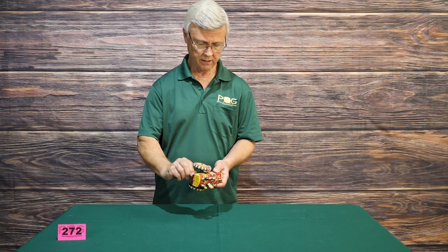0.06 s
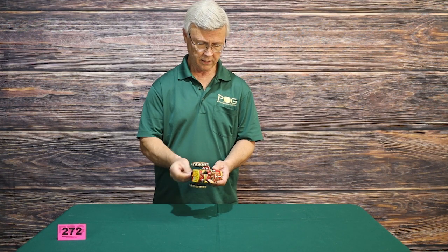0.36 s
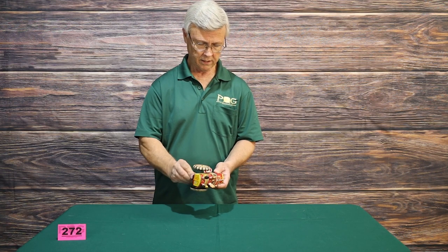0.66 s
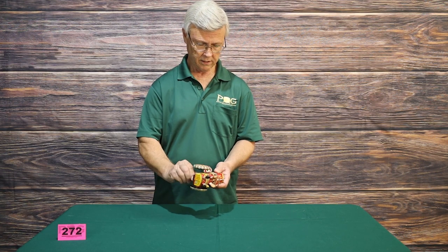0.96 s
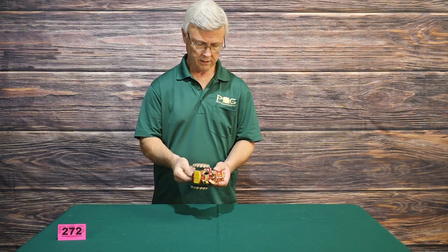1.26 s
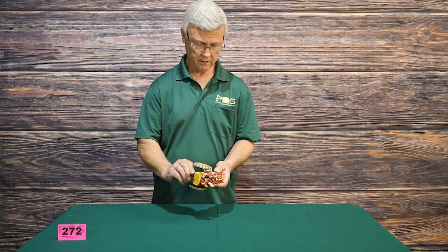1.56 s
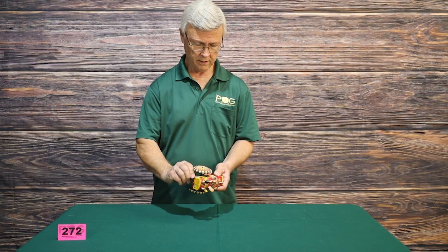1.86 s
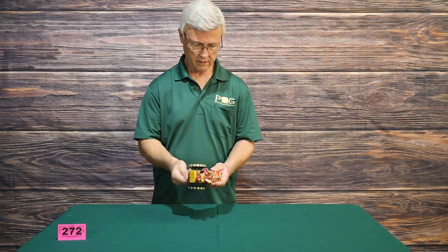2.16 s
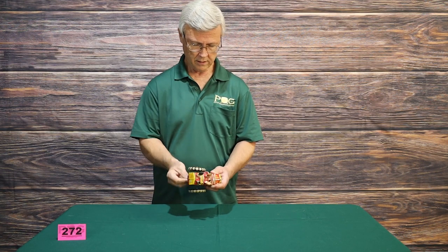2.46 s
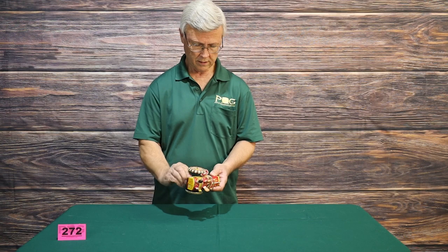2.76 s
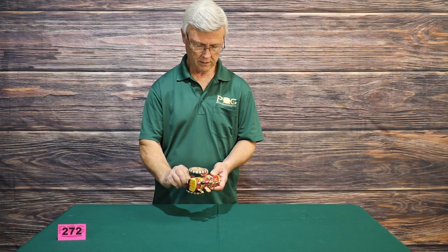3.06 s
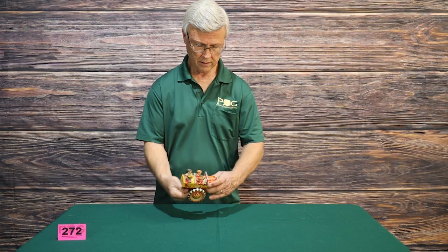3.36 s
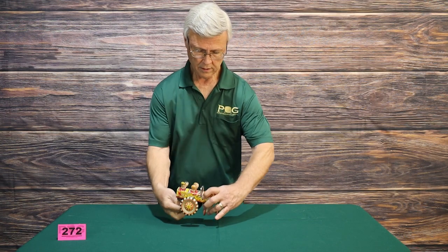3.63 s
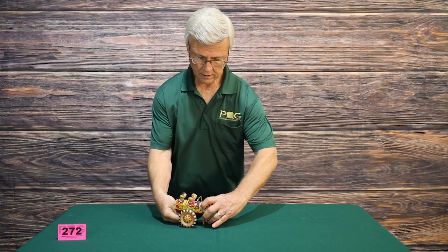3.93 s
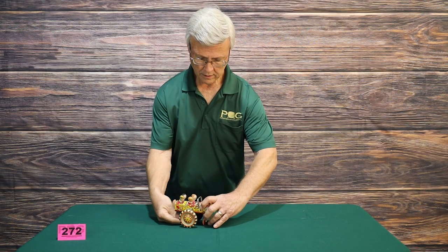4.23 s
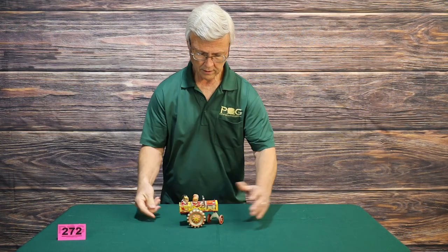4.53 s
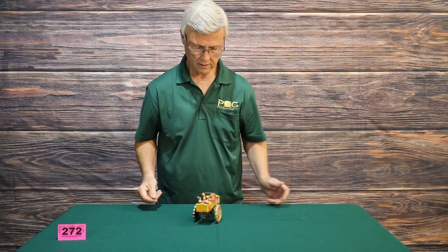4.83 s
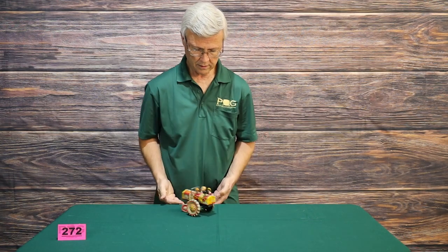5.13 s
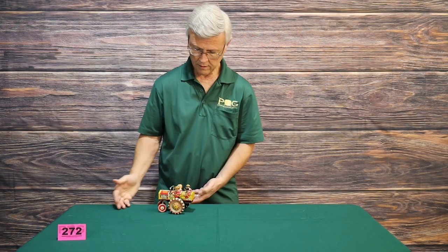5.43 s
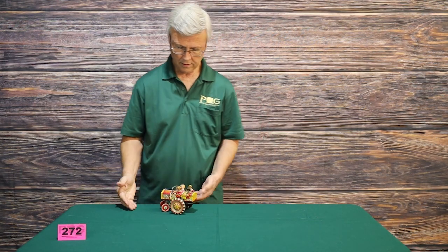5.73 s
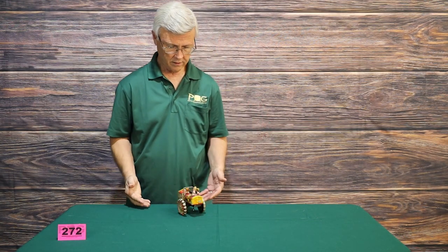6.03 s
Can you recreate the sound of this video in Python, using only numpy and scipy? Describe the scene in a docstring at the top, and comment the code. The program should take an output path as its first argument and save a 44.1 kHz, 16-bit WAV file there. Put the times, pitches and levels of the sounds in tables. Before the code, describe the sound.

Ratcheting clicks and key grinding from a wind-up tin tractor, followed by soft knocks, short gear whirrs and tinny clacks.

```python
"""A tin toy tractor's ratchet clicks as it is wound by hand in a small room; the key grinds and jolts.
Each impact is a broadband snap plus the damped modes of body, side plates, wheel, spring and pawl.
Set down on a cloth-covered table, the toy clinks, its gears whirr in spurts of tiny tooth contacts,
and it is nudged about with a few soft knocks and three sharp clacks.
A low hum and faint room noise lie underneath."""
import sys
import numpy as np
from scipy import signal
from scipy.io import wavfile

SR = 44100
rng = np.random.default_rng(int(sys.argv[2]) if len(sys.argv) > 2 else 0)


def transcribe(u):
    """Save the signal u as a 16-bit wav file named by the first command-line argument.

    u: samples, shape (n,) or (channels, n), limited to [-1, 1]; the rate is SR.
    q: integer samples, one column per channel.
    """
    v = np.clip(np.atleast_2d(u).T, -1, 1)
    q = np.round(v * 32767).astype(np.int16)
    wavfile.write(sys.argv[1], SR, q)


N = 272979
SIZE = 16384  # samples in one impulse response
AGE = np.arange(SIZE) / SR
TIME = np.arange(N) / SR


def amp(db):
    """Amplitude ratio of a level in decibels."""
    return 10 ** (np.asarray(db) / 20)


def unit(x):
    """Normalisation to rms 1."""
    return x / np.sqrt(np.mean(x ** 2) + 1e-20)


def levelled(x, db):
    """Normalisation of a transient by the rms level of its first 20 ms."""
    return amp(db) * x / np.sqrt(np.mean(x[:SR // 50] ** 2) + 1e-20)


def add(mix, s, sound):
    """Superposition: a sound joins the mix at s seconds."""
    part = mix[max(round(s * SR), 0):][:len(sound)]
    part += sound[:len(part)]


def colour(x, points):
    """Minimum-phase filtering by a curve of (f/Hz, level/dB) points."""
    hz, db = np.transpose(points)
    log_hz = np.log(abs(np.fft.fftfreq(SIZE, 1 / SR)) + 1)
    log_gain = np.log(amp(np.interp(log_hz, np.log(hz), db)))
    taps = np.fft.ifft(np.exp(signal.hilbert(log_gain).conj())).real[:SIZE // 2]
    return signal.fftconvolve(x, taps)[:len(x)]


def dying(t60):
    """Exponential decay: noise of energy 1 falls 60 dB in t60 seconds."""
    x = rng.standard_normal(SIZE) * amp(-60 * AGE / t60)
    return x / np.linalg.norm(x)


def blow(contact_s, rattle_db, room_db, rattle_t60=0.11):
    """Noise excitation: a brief scrape, rattle and early reflections, then reverberation."""
    room = dying(t60=0.31) * (1 - np.exp(-AGE / 0.0032))
    return dying(contact_s) + amp(rattle_db) * dying(rattle_t60) + amp(room_db) * room


def tap(rattle_db, room_db):
    """Impulse excitation: an instant contact, then rattle and reverberation."""
    room = dying(t60=0.34) * (1 - np.exp(-AGE / 0.003))
    return signal.unit_impulse(SIZE) + amp(rattle_db) * dying(t60=0.1) + amp(room_db) * room


def ring(modes, detune, spread_db=2):
    """Free vibration: damped modes (f/Hz, level/dB, T60/s), varied at random for strike point and grip."""
    hz, db, t60 = np.transpose(modes)[:, :, None]
    strength, shift, phase = rng.standard_normal((3, len(modes), 1))
    age = AGE[:SIZE // 2]
    waves = np.sin(2 * np.pi * (hz * (1 + detune * shift) * age + phase))
    return (amp(db + spread_db * strength - 60 * age / t60) * waves).sum(0)


def driven(response, drive, db):
    """Forced response: an impulse response convolved with its drive, set to an onset level."""
    return levelled(signal.fftconvolve(response, drive)[:SIZE], db)


def damped(x, extra_db, t60):
    """Two-stage decay: a hard-hit part starts louder and quickly sheds the excess."""
    return x * (1 + amp(extra_db) * amp(-60 * AGE[:len(x)] / t60))


def teeth(per_s, spread_db, hiss, rattle_db, contact_s):
    """Shot noise: tiny random contacts of unequal size over a smooth sliding hiss."""
    impulses = (rng.random(N) < per_s / SR) * amp(spread_db * np.minimum(rng.exponential(1, N), 3))
    impulses *= rng.choice([-1, 1], N)
    contacts = signal.fftconvolve(impulses, blow(contact_s, rattle_db, room_db=-18))[:N]
    return unit(contacts) + hiss * rng.standard_normal(N)


def strokes(rows, attack_s, release_s, swell_db_per_s):
    """Amplitude envelope: each stroke rises linearly, swells slowly and decays exponentially."""
    out = np.zeros(N)
    for start, end, db in rows:
        rise = np.clip((TIME - start) / attack_s, 0, 1)
        swell_db = swell_db_per_s * (np.clip(TIME, start, end) - (start + end) / 2)
        out += amp(db + swell_db) * rise * np.exp(-np.maximum(TIME - end, 0) / release_s)
    return out


# spectrum of the room noise (f/Hz, level/dB)
AIR_SPECTRUM = [(59, -35.5), (100, -12.5), (197, 0), (229, -2), (328, 1), (406, -5.5), (452, -6), (621, -8),
                (818, -6), (872, -2.5), (991, -12), (1330, -14), (16000, -39.5)]
# tones of a distant motor and the mains (f/Hz, level/dB)
HUM_TONES = [(28.5, -17), (41.3, -4), (57.9, 7), (60, -17), (115.8, -37), (120, -19)]
def background(air_db=-43, rumble_db=-56, hum_db=-39.5, fade_db_per_s=1.3):
    """Beating: close tones make a pulsing hum that slowly fades over stationary room noise."""
    air = unit(colour(rng.standard_normal(N + SIZE), AIR_SPECTRUM)[SIZE:])
    rumble_spectrum = [(12, 11.5), (40, 4), (110, 15.5), (250, -18), (1000, -90.5)]
    rumble = unit(colour(rng.standard_normal(N + SIZE), rumble_spectrum)[SIZE:])
    hum = unit(sum(amp(db) * np.sin(2 * np.pi * (hz * TIME + rng.random())) for hz, db in HUM_TONES))
    return amp(air_db) * air + amp(rumble_db) * rumble + amp(hum_db - fade_db_per_s * TIME) * hum


# spectrum of the grinding key (f/Hz, level/dB)
GRIND_SPECTRUM = [(200, -29.5), (500, 2), (1000, 13), (1350, -5), (2500, -1.5), (3000, -11), (3550, 9.5),
                  (3950, -21), (4500, 4), (5700, -9), (8000, -38), (9900, -12), (11500, -24), (16000, -22)]
# strokes of the key (start t/s, end t/s, level/dB)
KEY_TURNS = [(0, 0.113, -31), (0.362, 0.528, -40), (0.681, 0.957, -42.5), (0.948, 1.3, -39.5),
             (1.581, 1.787, -35.5), (2.076, 2.439, -41), (2.667, 2.89, -40), (3.093, 3.35, -41),
             (3.417, 3.6, -43)]
def key_grind():
    """Sliding friction: dense small contacts grind during each stroke of the key."""
    friction = teeth(per_s=140, spread_db=2, hiss=0.29, rattle_db=6.5, contact_s=0.023)
    envelope = strokes(KEY_TURNS, attack_s=0.0083, release_s=0.062, swell_db_per_s=6)
    return unit(colour(friction, GRIND_SPECTRUM)) * envelope


# spectrum of metal striking metal (f/Hz, level/dB)
SNAP_SPECTRUM = [(100, -20), (300, -24.5), (550, -0.5), (1000, -12), (1400, -4), (1850, -0.5), (2600, 0),
                 (4000, 0.5), (5400, -1), (7200, -7.5), (9000, -12), (12000, -15.5), (15500, -21.5),
                 (17000, 1.5)]
# short-lived modes of the thin tin shell (f/Hz, level/dB, T60/s)
SHELL_MODES = [(1400, -1, .04), (1669, 0, .05), (1830, 1, .05), (2060, -2, .04), (2390, -2, .05),
               (2761, 0, .06), (4000, 0, .04), (5780, -2, .04), (6470, -7, .05), (7730, -7, .06),
               (8915, -5, .05), (11560, -7, .04), (14400, -3, .03)]
def snap(scrape_db, shell_db=-7):
    """Broadband excitation: a contact, its chatter and the room's dull tail drive the tin shell."""
    chatter = blow(contact_s=0.048, rattle_db=3.5 + scrape_db, room_db=-11 + scrape_db, rattle_t60=0.13)
    chatter = colour(chatter, [(5000, 0.0043), (15000, -2)])
    tail = colour(dying(t60=0.26) * (1 - np.exp(-AGE / 0.0023)), [(4000, 0.0082), (12000, -9)])
    contact = amp(-2) * dying(t60=0.024) + chatter + amp(scrape_db - 1.5) * tail
    shell = signal.fftconvolve(ring(SHELL_MODES, detune=0.028), contact)[:SIZE]
    return unit(colour(contact, SNAP_SPECTRUM)) + amp(shell_db) * unit(shell)


# spectrum of the first instant of a hard contact (f/Hz, level/dB)
CRACK_SPECTRUM = [(200, -48), (550, -35), (1000, -19), (3000, 4), (7000, -11), (10000, 2), (13000, -1.5),
                  (15500, -1), (17000, 2)]
def crack(snap_db, growth=0.55):
    """Contact stiffening: harder blows are briefer, so their bright crack grows faster than the snap."""
    crack_db = snap_db - 7 + growth * (snap_db + 31)
    return levelled(colour(dying(t60=0.028), CRACK_SPECTRUM), crack_db)


# modes of the five parts: hollow body, side plates, wheel, spring, pawl (f/Hz, level/dB, T60/s)
BODY_MODES = [(620, -16.5, .04), (727.4, -3.5, 0.061), (785, -5, 0.074), (877.6, 5.5, 0.045),
              (1004, 5.5, 0.04), (1059, 5.5, 0.054), (1105, -14, 0.043), (1246, -10, .04)]
PLATE_MODES = [(2980, -18, 0.09), (2894, -8.5, 0.087), (3033, 5, 0.057), (3140, -6, 0.16), (3284, 8, 0.037),
               (3412, -0.5, 0.045), (3530, 1, 0.13), (3503, -2, 0.202), (3723, -8.5, 0.1)]
WHEEL_MODES = [(4330, -9, .03), (4470, -2, .08), (4503, 0, .11), (4600, -8, .04)]
SPRING_MODES = [(4850, -4, .04), (5020, -7, .05), (5224, 0, .12), (5400, -9, .04), (7700, -20, .07)]
PAWL_MODES = [(9337, 0, .1), (9560, -4, .07), (9990, -2, .06), (10130, -2, .07), (10415, -2, .13),
              (11100, -7, .06), (12170, -2, .09), (12930, -6, .1), (13960, -9, .1)]
def click(db, parts_db, scrape_db, body_pitch=1, sustain=1, plate_db_per_khz=0, grip_db=0):
    """Modal superposition: one impact gives a snap and a crack and sets all five parts ringing."""
    body_db, plate_db, wheel_db, spring_db, pawl_db = db + parts_db
    x = levelled(snap(scrape_db), db) + crack(db)
    body = ring(np.multiply(BODY_MODES, (body_pitch, 1, 1)), detune=0.0095)
    x += driven(body, blow(contact_s=0.0091, rattle_db=-4.5, room_db=-12.5), body_db)
    tilted = [(hz, level + plate_db_per_khz * hz / 1e3, t60 * sustain) for hz, level, t60 in PLATE_MODES]
    plates = damped(ring(tilted, detune=0.0036), extra_db=33 + grip_db, t60=0.064)
    x += driven(plates, tap(rattle_db=0.5, room_db=-9), plate_db)
    x += driven(ring(WHEEL_MODES, detune=0.0016), tap(rattle_db=-0.5, room_db=-14), wheel_db)
    spring = ring(np.multiply(SPRING_MODES, (1, 1, sustain)), detune=0.001538)
    spring = damped(spring, extra_db=12.5 + grip_db, t60=0.052)
    x += driven(spring, tap(rattle_db=-1, room_db=-7), spring_db)
    pawl = damped(ring(PAWL_MODES, detune=0.0022, spread_db=5.5), extra_db=0, t60=0.049)
    return x + driven(pawl, tap(rattle_db=-3.5, room_db=-16), pawl_db)


PAWL_SHARE = 0.33  # fraction of a contact's ringing/dB that the pawl receives
# coupling of a tick to body, side plates, wheel, spring, pawl (level/dB each)
TICK_COUPLING = (-5, 0, -2, -6, -6.5)
def tick(db, ring_db, lean_db):
    """Mechanical coupling: a ratchet tooth excites mostly the wheel and the side plates."""
    extra_db = (0, ring_db - lean_db, ring_db + lean_db, (ring_db + lean_db) / 2, PAWL_SHARE * ring_db)
    return click(db, np.add(TICK_COUPLING, extra_db), scrape_db=-1)


def light_ticks(spacing_s=0.045, relative_db=-13.5, spread_db=0.5):
    """Jittered impulse train: faint, uneven ticks run through every stroke of the key."""
    out = np.zeros(N)
    for start, end, db in KEY_TURNS:
        for s in np.arange(start, end - spacing_s / 2, spacing_s):
            strength, lean = spread_db * rng.standard_normal(2)
            onset = s + spacing_s * rng.random()
            add(out, onset, tick(db + relative_db + strength, ring_db=12, lean_db=lean - 1))
    return out


# ratchet ticks (t/s, level/dB, ringing/dB, lean from side plates to wheel/dB)
RATCHET_TICKS = [(.029, -33, 7, -1.5), (.042, -20.5, -3, 2.5), (.065, -24.5, 4, 7.5), (.087, -24, 1.5, -2),
                 (.120, -23, 4.5, -0.5), (0.165, -48.5, 23.5, -1.5), (.236, -51, 9, 2),
                 (0.439, -46.5, 12, 3), (0.61, -30, -8, -7), (.623, -37.5, 12.5, 2.5), (.632, -30, 9, 0),
                 (0.818, -56.5, 18.5, 1), (0.88, -43, 12, -1), (.942, -32.5, 3.5, -6), (0.955, -36, 7, 2),
                 (1.019, -28, 1, 3), (1.0375, -23.5, 0, -0.5), (1.105, -30, 9, 2), (1.176, -27.5, 8, 0.5),
                 (1.351, -21.5, 3, -0.5), (1.369, -20.5, 1.5, 0.5), (1.397, -21, 1, 3.5),
                 (1.6837, -42.5, 9, 0.5), (1.762, -46, 7.5, -3), (1.777, -32.5, 4, 7),
                 (1.8752, -38, -2, 4.5), (1.881, -26.5, 4.5, -0.5), (1.894, -19, -3.5, 2),
                 (1.907, -27.5, 8.5, 6.5), (1.956, -22.5, 6, 1.5), (2.106, -52.5, 20, -2),
                 (2.303, -29, 2.5, 2), (2.379, -50, 16, -2), (2.447, -25.5, 6, 0), (2.460, -27, 3, 3),
                 (2.712, -47, 0.5, -13), (2.770, -41.5, 4.5, -4.5), (2.846, -53, 14, -6),
                 (2.859, -21, 7, 2.5), (2.878, -45, 23, 3), (2.892, -31.5, 10, -9.5), (2.912, -25.5, 1, 3),
                 (2.935, -26, 4, 2), (2.965, -28, -1.5, -1.5), (3.0811, -49.5, 8, 0),
                 (3.114, -34.5, 1.5, -2), (3.124, -28, -1.5, -0.5), (3.199, -52, 11, -5),
                 (3.212, -29.5, 0, 1), (3.374, -21, 1, 0.5), (3.489, -55.5, 17.5, 5.5)]
def ratchet():
    """Impact excitation: the pawl drops over tooth after tooth as the toy is wound."""
    out = np.zeros(N)
    for s, db, ring_db, lean_db in RATCHET_TICKS:
        add(out, s, tick(db, ring_db, lean_db))
    return out


# notes of the ringing pawl (t/s, f/Hz, level/dB)
PAWL_RINGS = [(.087, 9350, -25), (1.019, 12100, -36), (1.0378, 10460, -27.5), (1.176, 9740, -27),
              (1.397, 9450, -29), (1.956, 10200, -16.5), (3.124, 10120, -31.5), (3.374, 13100, -19),
              (3.510, 12400, -39), (5.4195, 13960, -29)]
def pawl_notes(t60=0.038, split_hz=70):
    """Free vibration: now and then the pawl springs clear and sings on a close pair of modes."""
    out = np.zeros(N)
    for s, hz, db in PAWL_RINGS:
        pair = ring([(hz, 0, t60), (hz + split_hz, -3, t60 / 2)], detune=0.0005)
        note = damped(pair, extra_db=-1.5, t60=0.035)
        add(out, s, driven(note, tap(rattle_db=-10, room_db=-16), db))
    return out


# jolts of the key in its socket (t/s, level/dB, ringing/dB)
KEY_JOLTS = [(0.352, -34, 0), (.483, -23, -9), (.493, -27, -3), (1.0769, -25.5, -2), (1.150, -23.5, -5),
             (1.2048, -24, -3), (1.225, -29.5, 1.5), (1.293, -41, 10.5), (1.570, -36.5, 3),
             (1.798, -32.5, -15), (2.256, -19.5, -1.5), (2.418, -24.5, 1.5), (2.632, -40, -0.5),
             (3.1742, -22.5, -4.5), (3.257, -22.5, 2), (3.3103, -24.5, -4), (3.317, -24.5, -2),
             (3.334, -30, -3), (3.360, -30, -1)]
# coupling of a jolt to body, side plates, wheel, spring, pawl (level/dB each)
JOLT_COUPLING = (1.5, -0.5, -5.5, -7.5, -18.5)
def key_jolts():
    """Body resonance: the jolting key shakes the hollow body, with more scrape than a tick."""
    out = np.zeros(N)
    for s, db, ring_db in KEY_JOLTS:
        extra_db = (0, ring_db, ring_db, ring_db / 2, PAWL_SHARE * ring_db)
        add(out, s, click(db, np.add(JOLT_COUPLING, extra_db), scrape_db=2))
    return out


# clinks and three clacks of loose tin (t/s, level/dB, ringing/dB, lean from side plates to spring/dB)
TIN_CLINKS = [(3.510, -35, 9, -0.5), (3.529, -42, 6.5, 0), (3.573, -44, 3, -2.5), (3.762, -38, -19.5, 2),
              (3.79, -40.5, -10, 5), (3.798, -42.5, -7, -8.5), (3.877, -35.5, -16.5, -11),
              (3.93, -44, 10, -8), (3.936, -27, -5.5, 3.5), (4.268, -41, 10.5, -4.5), (4.415, -39, -12, 3),
              (4.452, -45, 2.5, 4.5), (4.458, -37.5, -17, -9), (4.6723, -50.5, 3, 9.5), (4.735, -50, -7, 0),
              (4.816, -49, -4, -3), (4.896, -50, -8, 2), (4.971, -49, -10, 8), (5.002, -41, -18, 5.5),
              (5.085, -47, -16, -4), (5.21, -58, -4, 2), (5.231, -49, -1, 10), (5.2584, -16, -2.5, -4),
              (5.339, -18, -2, 0.5), (5.4191, -18, -6, -2), (5.492, -47, 0.5, -3), (5.877, -64, -1, 5),
              (5.926, -50, -8.5, 8), (6.072, -57, 1, -3), (6.114, -62, 17.5, -3.5), (6.161, -61, 9.5, -8)]
# coupling of a clink to body, side plates, wheel, spring, pawl (level/dB each)
CLINK_COUPLING = (-4.5, 1, 1.5, 2, -7.5)
def clinks(wheel_growth=0.22):
    """Free boundaries: out of the hand, the body rings higher and the spring and low plate modes sing."""
    out = np.zeros(N)
    for s, db, ring_db, lean_db in TIN_CLINKS:
        wheel_db = ring_db + wheel_growth * (db + 13)  # hard blows reach the wheel best
        extra_db = (0, ring_db - lean_db, wheel_db, ring_db + lean_db, PAWL_SHARE * ring_db)
        clink = click(db, np.add(CLINK_COUPLING, extra_db), scrape_db=-6,
                      body_pitch=1.08, sustain=0.74, plate_db_per_khz=-20, grip_db=-15)
        add(out, s, clink)
    return out


# modes of the table top and of the chassis (f/Hz, level/dB, T60/s)
TABLE_MODES = [(179, -3, 0.062), (201, -3.5, 0.088), (256, -10.5, 0.22), (328, -11, 0.18), (419, 13, 0.017)]
CHASSIS_MODES = [(474, -14, 0.067), (583, -11.5, 0.047), (598, 3.5, 0.024), (761, 4.5, 0.075),
                 (919, -7, 0.089), (980, 1.5, 0.038), (1480, -13, 0.058), (2460, -29, 0.018)]
# blows of wheels and hands on the table (t/s, table level/dB, chassis level/dB)
TABLE_BLOWS = [(3.939, -24.5, -21.5), (3.948, -23.5, -20), (3.964, -27.5, -36), (3.989, -30.5, -48),
               (4.280, -26, -33.5), (4.298, -33.5, -31), (5.14, -23.5, -33), (5.158, -31.5, -34),
               (5.259, -29, -41), (5.302, -31, -32.5), (5.422, -40, -55), (5.591, -40.5, -38.5),
               (5.64, -37, -36), (5.686, -29, -26), (6.177, -25, -42)]
def knocks():
    """Cushioned impact: blows softened by the cloth drive the low modes of table top and chassis."""
    out = np.zeros(N)
    for s, table_db, chassis_db in TABLE_BLOWS:
        table = ring(TABLE_MODES, detune=0.026)
        add(out, s, driven(table, blow(contact_s=0.03, rattle_db=8, room_db=4), table_db))
        chassis = ring(CHASSIS_MODES, detune=0.022)
        add(out, s, driven(chassis, blow(contact_s=0.02, rattle_db=5, room_db=-6), chassis_db))
    return colour(out, [(70, -20), (160, -4.5), (1100, -2.5), (3000, 0), (7000, -2)])


# modes of gear teeth and loose tin figures (f/Hz, level/dB, T60/s)
PING_MODES = [(1750, -2, .035), (3050, -1, .035), (4250, 0, .035), (5100, 1, .045), (5500, -2, .025),
              (6700, -7, .02), (7600, -9, .02), (10550, -17, .03)]
def pings(per_s, spread_db):
    """Poisson excitation: each small part is plucked at its own random moments."""
    out = np.zeros(N)
    for mode in PING_MODES:
        plucks = (rng.random(N) < per_s / SR) * amp(spread_db * np.minimum(rng.exponential(1, N), 2.5))
        out += signal.fftconvolve(plucks, ring([mode], detune=0.0049))[:N]
    return unit(signal.fftconvolve(out, tap(rattle_db=-8, room_db=-12))[:N])


# spectrum of the running gears (f/Hz, level/dB)
WHIRR_SPECTRUM = [(300, 8), (700, -1), (1050, 3), (1300, -5.5), (1800, -5.5), (3800, -2), (5000, -2.5),
                  (6500, -14.5), (8700, -15), (10000, -28), (10550, -1), (11300, -23), (16000, -24)]
# short runs of the gear train (start t/s, end t/s, level/dB)
GEAR_SPURTS = [(4.42, 4.47, -43), (4.7, 4.82, -42), (4.89, 5.12, -40.5), (5.19, 5.48, -34.5),
               (5.98, 6.19, -48)]
def gears(whirr_db=-2, ping_db=-9):
    """Gear rattle: rapid tooth contacts merge into a whirr while the jiggled tin pings."""
    contacts = teeth(per_s=97, spread_db=6.5, hiss=0.2, rattle_db=-0.5, contact_s=0.0058)
    whirr = unit(colour(contacts, WHIRR_SPECTRUM))
    running = amp(whirr_db) * whirr + amp(ping_db) * pings(per_s=18, spread_db=3)
    return running * strokes(GEAR_SPURTS, attack_s=0.01, release_s=0.035, swell_db_per_s=3)


# radiation efficiency of the small tin shell, poor in the bass (f/Hz, level/dB)
SHELL_RADIATION = [(100, -21), (300, -13.5), (550, 0), (16000, -1)]
def scene():
    """Superposition: room, key, gears and table sum in mono with the clicks the shell radiates."""
    mix = background() + key_grind() + gears() + knocks()
    tin = ratchet() + pawl_notes() + key_jolts() + clinks() + light_ticks()
    return (mix + colour(tin, SHELL_RADIATION))[None]


def record(dry):
    """Saturation and band limiting: peaks clip at full scale, then a low-pass cuts the top treble."""
    lowpass = signal.firwin(255, cutoff=15920, window=("kaiser", 8), fs=SR)
    return signal.oaconvolve(np.clip(dry, -1, 1), lowpass[None], "same")


dry = scene()
out = record(dry)
transcribe(out)
```